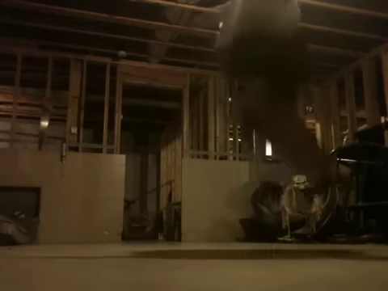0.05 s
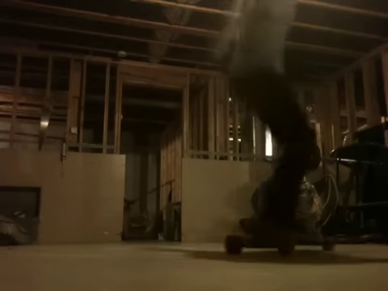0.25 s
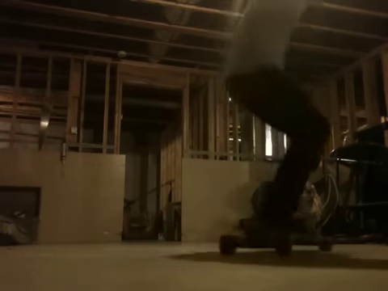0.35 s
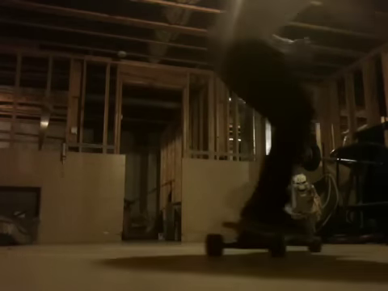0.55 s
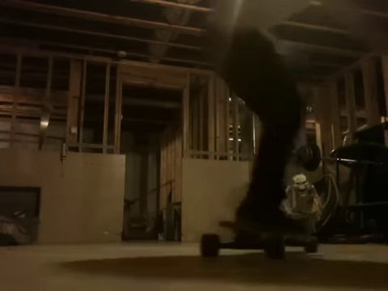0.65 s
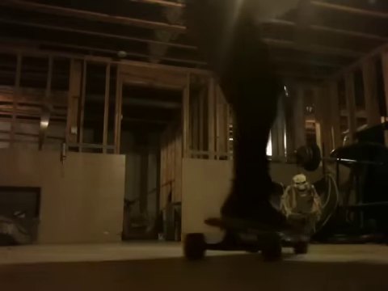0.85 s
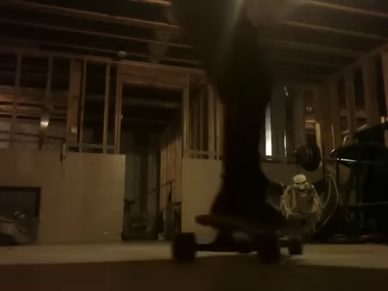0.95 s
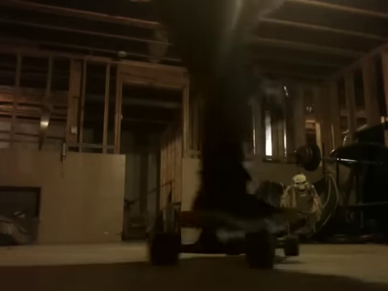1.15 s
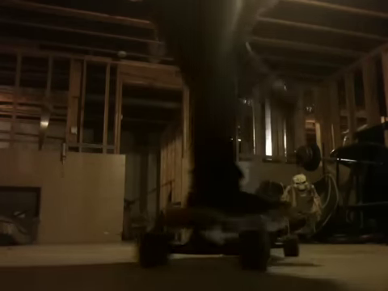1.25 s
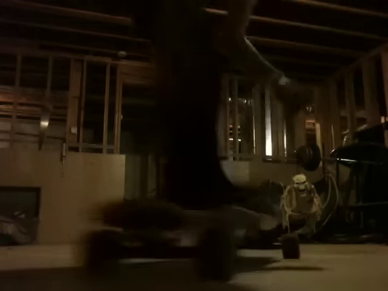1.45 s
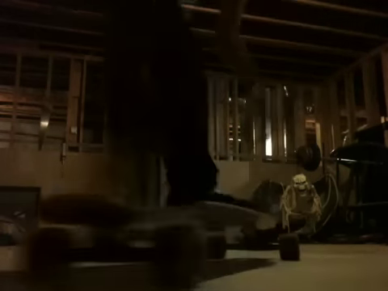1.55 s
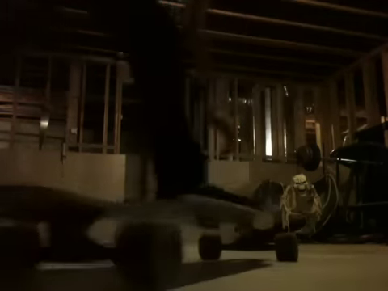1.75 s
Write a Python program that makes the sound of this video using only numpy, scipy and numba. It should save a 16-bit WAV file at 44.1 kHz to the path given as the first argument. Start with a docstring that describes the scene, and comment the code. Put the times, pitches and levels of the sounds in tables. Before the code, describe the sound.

Skateboard landing slams onto concrete in a bare garage after a sharp clack, then rolls quietly

```python
"""A longboard rolls over a concrete floor in a bare garage; grain noise makes its unloaded wheels sing.
During a hop the board clacks once, noise bursts with modal rings, and a shoe rasps over the grip tape.
The rider lands: a quick cluster of blows fills the room; the deck's modes ring on and, with the blows, drive a limiter.
The board rolls on quietly as shaped grain noise, with ticks of grit, small knocks and one short scuff.
Band by band, stored energy forms the reverberation; a faint steady background lies beneath."""
import sys
import numpy as np
from scipy import signal
from scipy.fft import rfft, irfft
from scipy.io import wavfile
from numba import njit

SR = 44100
rng = np.random.default_rng(int(sys.argv[2]) if len(sys.argv) > 2 else 0)


def wav_record(signal):
    """Record a signal, one row per channel, as 16-bit PCM in the file named by sys.argv[1]."""
    frames = np.transpose(np.atleast_2d(signal))
    bounded = np.clip(frames, -1, 1)
    # unit amplitude maps onto the largest positive 16-bit level
    quanta = np.round(bounded * 32767).astype(np.int16)
    wavfile.write(sys.argv[1], SR, quanta)


N = 79380

# Steady background spectrum: (frequency [Hz], level [dB])
BACKGROUND_SPECTRUM = [(30, 18.5), (90, 12.5), (200, 15.5), (1000, 1.5), (3000, 5.5), (9000, 2.5),
                       (16000, -3)]
BACKGROUND_DB = -69.5  # rms

# Rolling levels before flutter: (time [s], rumble level [dB], gritty hiss level [dB])
ROLLING_LEVELS = [(0, -66, -67.5), (.04, -60, -65), (0.118, -60.5, -63), (.6, -62.5, -66.5),
                  (.8, -59, -75.5), (.95, -67.5, -105), (1.28, -67, -83), (1.38, -66.5, -69.5),
                  (1.471, -61, -64), (1.55, -59.5, -68.5), (1.65, -60.5, -62), (1.719, -69, -79),
                  (1.8, -62, -81)]
# Rumble spectrum: (frequency [Hz], level [dB])
RUMBLE_SPECTRUM = [(30, -20), (80, -15), (140, -8.5), (290, 3.5), (400, 0.5), (540, 3.5), (750, -9),
                   (1000, -4), (1500, -10), (2300, -25), (8000, -37.5)]
# Gritty hiss spectrum: (frequency [Hz], level [dB])
HISS_SPECTRUM = [(200, -17), (550, -1.5), (750, -3), (1000, -4), (1600, 4), (2200, -10.5), (5000, -6),
                 (8000, -14.5), (16000, -21.5)]
# Singing of the unloaded wheels: (frequency [Hz], level [dB])
FREE_WHEEL_SPECTRUM = [(300, -32), (560, -12), (750, 4.5), (880, -12.5), (1150, -8.5), (2000, -25),
                       (6000, -44.5)]
FREE_WHEEL_DB = -55.5
GRAIN_SPREAD_DB = 2.5  # mean of the exponentially distributed gain of a grain
FLUTTER_DB, FLUTTER_HZ = 1.5, 30.24  # standard deviation and rate of the random level points
ROLL_ROOM_DB = -4.5

# Contacts of the clack, and a late echo of it:
# (time [s], wood level [dB], truck ring level before scaling [dB])
CLACK_ARRIVALS = [(0.1262, -22, -23), (0.1282, -19, -7.5), (0.1307, -23, -10), (0.1366, -26.5, -28),
                  (0.1523, -24.5, -24.5)]
# Clack spectrum: (frequency [Hz], level [dB])
CLACK_SPECTRUM = [(40, -29), (130, -9.5), (270, 4), (450, 3), (780, 6), (1200, 0.5), (1800, -19.5),
                  (4000, -15), (8000, -23), (10000, -31), (15000, -39)]
# Modes of the metal truck: (frequency [Hz], level [dB], t60 [s])
TRUCK_RING_MODES = [(2640, -4.5, .018), (2962, 0, 0.02), (3130, 3, 0.047), (3500, -5.5, .018),
                    (3660, -1.5, 0.031), (3960, -7.5, 0.016)]
CLACK_T60_S, CLACK_ROOM_DB = 0.013, -2
TRUCK_DB, TRUCK_ROOM_DB = -1, -6

# Shoe on grip tape: (frequency [Hz], level [dB])
SLIDE_SPECTRUM = [(200, -9), (1200, -8.5), (2500, 3.5), (5000, -4), (8000, -7), (10000, -15),
                  (15000, -25.5)]
SLIDE_START_S, SLIDE_DB, SLIDE_T60_S, SLIDE_ROOM_DB = 0.16, -42, 0.23, -4.5

# Blows of the landing: (time [s], level [dB], contact hardness as a treble cutoff [Hz])
LANDING_BLOWS = [(0.234, -2, 218.6), (0.2379, -5.5, 9980), (0.243, 0.5, 1500), (0.2513, 3, 4000),
                 (0.2617, 4, 1800), (0.2726, 2.5, 3500), (0.279, 0, 1940), (0.2864, -4.5, 6784),
                 (0.301, -5.5, 2500), (0.309, -2.5, 1199)]
# Spectrum of a blow: (frequency [Hz], level [dB])
BLOW_SPECTRUM = [(30, -27.5), (55, -23), (90, -27), (130, -7.5), (200, -6.5), (280, 2.5), (400, 2.5),
                 (750, 0), (1000, -2.5), (1600, -3), (2100, -7), (3200, -6.5), (5000, -14), (10000, -12),
                 (16000, -19)]
# Modes of the loaded deck: (frequency [Hz], level [dB])
LOADED_DECK_MODES = [(174, -14), (288, 1), (348, -7), (438, -3), (519, -2), (590, -7), (701, -3), (729, -4),
                     (773, -2), (917, -11), (1213, -10), (1244, -3), (1352, -10), (1686, -6)]
BLOW_T60_S, BLOW_ROOM_DB = 0.04, -6.5
DECK_DB, DECK_T60_S = -18.5, 0.27

# Grit cracking under the wheels: (time [s], level [dB], centre frequency [Hz])
GRIT_TICKS = [(0.6144, -45, 4560), (0.701, -50.5, 3760), (0.7165, -51, 10000), (0.7947, -60, 3470),
              (0.9898, -54, 2990), (1.1784, -53, 2293), (1.2494, -47, 9010), (1.269, -52.5, 7000),
              (1.3783, -49.5, 11000), (1.758, -50.5, 8890)]
TICK_T60_S, TICK_ROOM_DB = 0.0075, -8
TICK_OCTAVES = .9  # distance from the centre at which the gain is halved

# Small knocks of the trucks as the rider settles: (time [s], level [dB])
TRUCK_KNOCKS = [(0.704, -42), (0.720, -41.5), (0.793, -50), (0.850, -65), (0.918, -51.5), (1.7603, -44),
                (1.782, -52), (1.791, -54.5)]
# Spectrum of a knock: (frequency [Hz], level [dB])
KNOCK_SPECTRUM = [(50, -15), (150, -4), (300, 8), (550, 12.5), (900, -7.5), (1500, -6.5), (2500, -10),
                  (12000, -34)]
KNOCK_T60_S, KNOCK_ROOM_DB = 0.022, -3

# Wheel scrubbing sideways close by: (frequency [Hz], level [dB])
SCUFF_SPECTRUM = [(50, -29.5), (120, -8), (400, 4), (800, 5.5), (1300, 1), (2400, 1), (3500, -1),
                  (6000, -8.5), (10000, -11.5), (16000, -20)]
SCUFF_PEAK_S, SCUFF_DB, SCUFF_ROOM_DB = 1.604, -48, -15
SCUFF_RISE_S, SCUFF_FALL_S = 0.023, 0.039  # exponential time constants

ROOM_T60_S, ROOM_DAMP_HZ = .45, 12100  # bass reverberation time; frequency at which it is halved
ROOM_BUILD_S = 0.0026  # time constant of the build-up

MIC_LOW_HZ, TOP_HZ = 109, 15800  # edges of the microphone bass cut and the final treble cut
LIMIT_DB, LIMIT_ATTACK_S, LIMIT_RELEASE_S = 0, .0005, .015
CEILING = .7  # amplitude that the rounded peaks approach


def undb(db):
    """Level definition: decibels become an amplitude ratio."""
    return 10 ** (np.asarray(db) / 20)


def unit(x):
    """Power normalization: scale to rms 1."""
    return x / np.sqrt(np.mean(x ** 2))


def on_log_axis(hz, table):
    """Logarithmic frequency scale: interpolate a (frequency, value) table along it."""
    table_hz, values = np.array(table, float).T
    return np.interp(np.log(np.maximum(hz, 1)), np.log(table_hz), values)


def colour(x, table):
    """Linear filtering: weight the spectrum of a steady sound, then scale to rms 1."""
    gain = undb(on_log_axis(np.fft.rfftfreq(N, 1 / SR), table))
    return unit(irfft(rfft(x) * gain, N))


def noise(table):
    """Stationary random noise: a Gaussian signal takes the given spectrum."""
    return colour(rng.standard_normal(N), table)


def since(start):
    """Elapsed time: seconds since a moment, zero before it."""
    return np.maximum(np.arange(N) / SR - start, 0)


def decay(start, t60):
    """Exponential damping: a sudden onset falls by 60 dB in t60 seconds."""
    age = since(start)
    return (age > 0) * np.exp(-np.log(1000) * age / t60)


def grains():
    """Granular excitation: dense tiny impacts of uneven size."""
    return rng.standard_normal(N) * undb(GRAIN_SPREAD_DB * rng.exponential(size=N))


def send(x, wet_db):
    """Direct and reverberant fields: return the direct sound and the share that feeds the room."""
    return np.array([x, undb(wet_db) * x])


def background():
    """Stationary noise: a faint hiss holds one spectrum and level throughout."""
    return undb(BACKGROUND_DB) * noise(BACKGROUND_SPECTRUM)


def wheels():
    """Roughness excitation: concrete grain makes the wheels rumble, hiss and, unloaded, sing."""
    t = since(0)
    times, rumble_db, hiss_db = np.array(ROLLING_LEVELS).T
    level_points = rng.standard_normal(N)
    flutter = undb(FLUTTER_DB * np.interp(t * FLUTTER_HZ, np.arange(N), level_points))
    rumble = colour(grains(), RUMBLE_SPECTRUM) * undb(np.interp(t, times, rumble_db))
    hiss = colour(grains(), HISS_SPECTRUM) * undb(np.interp(t, times, hiss_db))
    before_landing = t < LANDING_BLOWS[0][0]
    singing = colour(grains(), FREE_WHEEL_SPECTRUM) * undb(FREE_WHEEL_DB) * before_landing
    return send((rumble + hiss + singing) * flutter, ROLL_ROOM_DB)


def garage(x):
    """Diffuse-field energy balance: each third of an octave stores energy and loses it, treble sooner."""
    edges = np.geomspace(66, 17000, 25)
    build = np.exp(-1 / (ROOM_BUILD_S * SR))
    reverberation = 0
    for lo, hi in zip(edges, edges[1:]):
        band = signal.butter(3, [lo, hi], "bandpass", fs=SR, output="sos")
        t60 = ROOM_T60_S / (1 + lo * hi / ROOM_DAMP_HZ ** 2)
        keep = np.exp(-2 * np.log(1000) / (t60 * SR))  # energy decays at twice the amplitude rate
        power = signal.sosfilt(band, x) ** 2
        fed = signal.lfilter([1 - build], [1, -build], power)
        stored = signal.lfilter([1 - keep], [1, -keep], fed)
        diffuse = unit(signal.sosfilt(band, rng.standard_normal(N)))
        reverberation = reverberation + np.sqrt(stored) * diffuse
    return reverberation


def strike(push, table):
    """Impulse response: contact noise under the envelope `push` excites a minimum-phase body."""
    gain = undb(on_log_axis(np.fft.rfftfreq(N, 1 / SR), table))
    cepstrum = irfft(np.log(unit(gain)), N)
    causal = cepstrum * (1 + np.sign(np.fft.fftfreq(N)))  # folding onto positive time: minimum phase
    body = irfft(np.exp(rfft(causal)), N)
    contact = push * rng.standard_normal(N)
    return signal.fftconvolve(contact, body)[:N]


def ring(start, modes):
    """Modal superposition: damped sinusoids start at one moment."""
    age = since(start)
    return sum(undb(db) * decay(start, t60) * np.sin(2 * np.pi * hz * age) for hz, db, t60 in modes)


def clack():
    """Impact and modal resonance: a wooden crack and a brief metallic truck ring, with a late echo."""
    push = sum(undb(db) * decay(start, CLACK_T60_S) for start, db, _ in CLACK_ARRIVALS)
    wood = strike(push, CLACK_SPECTRUM)
    rings = sum(undb(db) * ring(start, TRUCK_RING_MODES) for start, _, db in CLACK_ARRIVALS)
    metal = undb(TRUCK_DB) * rings / len(TRUCK_RING_MODES)
    return send(wood, CLACK_ROOM_DB) + send(metal, TRUCK_ROOM_DB)


def slide():
    """Sliding friction: grip tape rasps under a shoe and fades exponentially."""
    rasp = undb(SLIDE_DB) * decay(SLIDE_START_S, SLIDE_T60_S) * colour(grains(), SLIDE_SPECTRUM)
    return send(rasp, SLIDE_ROOM_DB)


def soften(x, hz):
    """Contact compliance: a softer contact takes more treble away."""
    lowpass = signal.butter(1, min(hz, SR / 2 - 1), fs=SR, output="sos")
    return signal.sosfilt(lowpass, x)


def landing():
    """Energy accumulation in modes: successive blows crack and each feeds the deck's ring."""
    cracks = 0
    for start, db, hardness in LANDING_BLOWS:
        push = undb(db) * decay(start, BLOW_T60_S)
        cracks = cracks + soften(strike(push, BLOW_SPECTRUM), hardness)
    deck = 0
    for hz, mode_db in LOADED_DECK_MODES:
        energy = 0
        for start, db, hardness in LANDING_BLOWS:
            amplitude = undb(db) * decay(start, DECK_T60_S)
            energy = energy + amplitude ** 2 / (1 + (hz / hardness) ** 2)
        oscillation = np.sin(2 * np.pi * (hz * since(0) + rng.random()))
        deck = deck + undb(mode_db) * np.sqrt(energy) * oscillation
    direct_deck = np.array([undb(DECK_DB) * deck, np.zeros(N)])  # the ring does not feed the room
    return send(cracks, BLOW_ROOM_DB) + direct_deck


def grit():
    """Brittle fracture: single grains crack as short noise bursts, each in its own broad band."""
    hz = np.fft.rfftfreq(N, 1 / SR) + 1  # offset avoids log of zero
    ticks = 0
    for start, db, centre in GRIT_TICKS:
        band = 1 / (1 + (np.log2(hz / centre) / TICK_OCTAVES) ** 4)
        crackle = unit(irfft(rfft(rng.standard_normal(N)) * band, N))
        ticks = ticks + undb(db) * decay(start, TICK_T60_S) * crackle
    return send(ticks, TICK_ROOM_DB)


def knocks():
    """Structure-borne impact: the deck's spectrum dulls short bursts of contact noise."""
    push = sum(undb(db) * decay(start, KNOCK_T60_S) for start, db in TRUCK_KNOCKS)
    return send(strike(push, KNOCK_SPECTRUM), KNOCK_ROOM_DB)


def scuff():
    """Sliding friction: a sideways wheel's gritty noise swells and fades exponentially."""
    age = since(0) - SCUFF_PEAK_S
    swell = np.exp(np.minimum(age / SCUFF_RISE_S, -age / SCUFF_FALL_S))
    return send(undb(SCUFF_DB) * swell * colour(grains(), SCUFF_SPECTRUM), SCUFF_ROOM_DB)


def scene():
    """Superposition: the board's direct sounds, their reverberation and the background add."""
    direct, to_room = wheels() + clack() + slide() + landing() + grit() + knocks() + scuff()
    return (direct + garage(to_room) + background())[None]


@njit
def follow(x, attack, release):
    """Envelope detection: a first-order follower rises and falls at separate rates."""
    out, envelope = np.empty(len(x)), 0.
    for i in range(len(x)):
        envelope += (x[i] - envelope) * (attack if x[i] > envelope else release)
        out[i] = envelope
    return out


def record(dry):
    """Band and amplitude limitation: bass is cut, the landing held, peaks rounded and the top cut."""
    bass_cut = signal.butter(3, MIC_LOW_HZ, "highpass", fs=SR, output="sos")
    thin = signal.sosfilt(bass_cut, dry)
    attack = 1 - np.exp(-1 / (LIMIT_ATTACK_S * SR))
    release = 1 - np.exp(-1 / (LIMIT_RELEASE_S * SR))
    peak = follow(np.abs(thin[0]), attack, release)
    held = thin / np.maximum(peak / undb(LIMIT_DB), 1)
    rounded = held / (1 + (held / CEILING) ** 6) ** (1 / 6)
    top_cut = signal.ellip(8, .2, 70, TOP_HZ, fs=SR, output="sos")
    return signal.sosfilt(top_cut, rounded)


dry = scene()
out = record(dry)
wav_record(out)
```